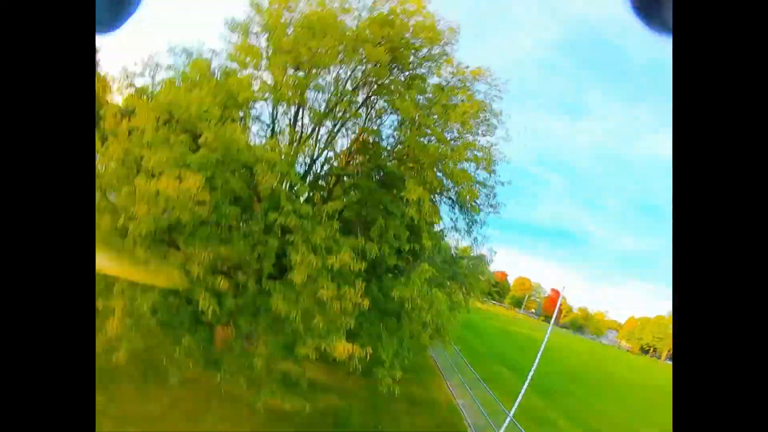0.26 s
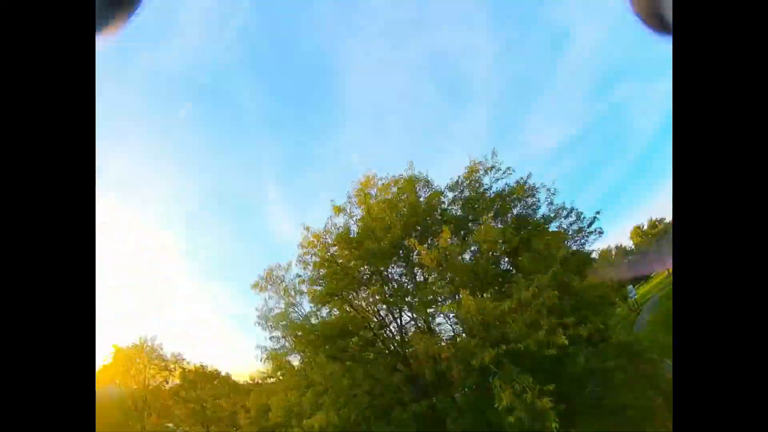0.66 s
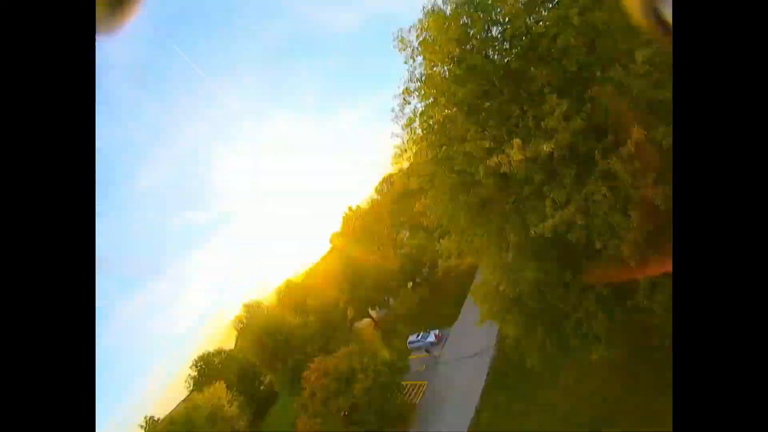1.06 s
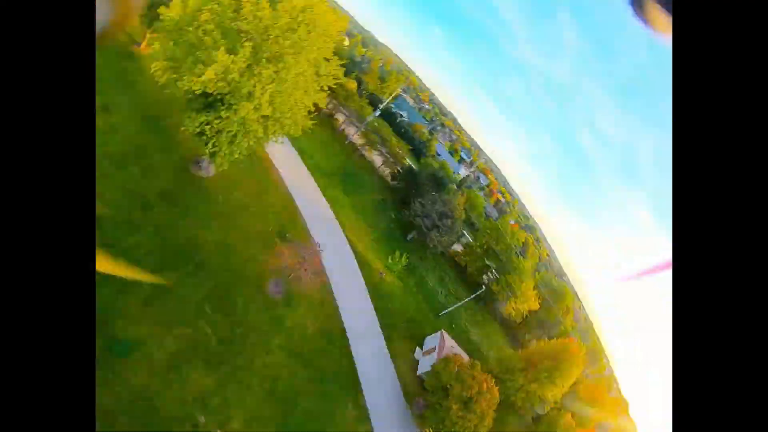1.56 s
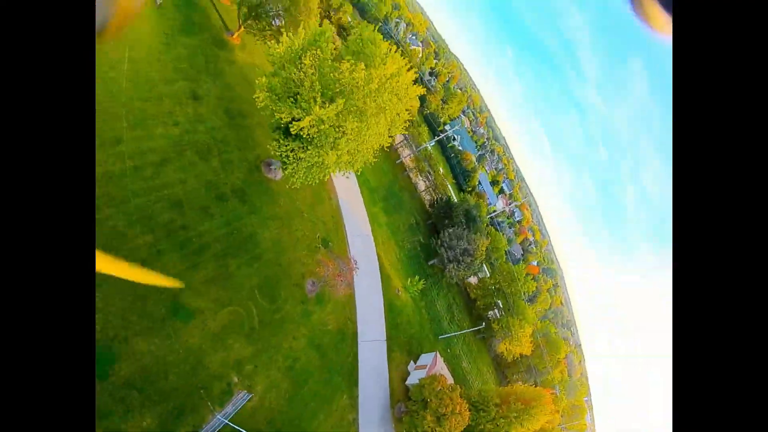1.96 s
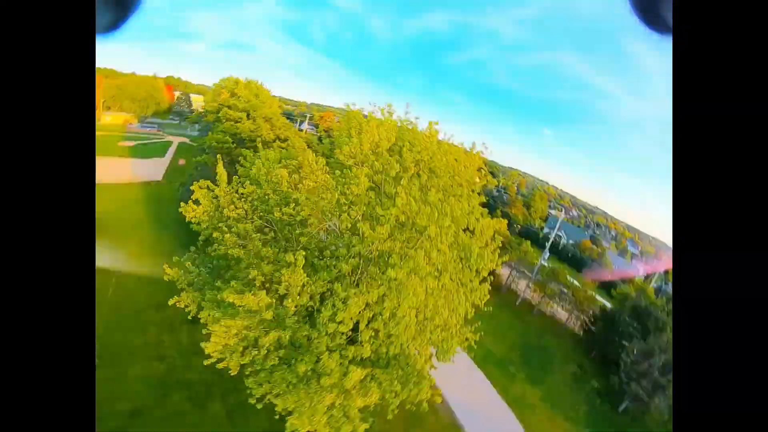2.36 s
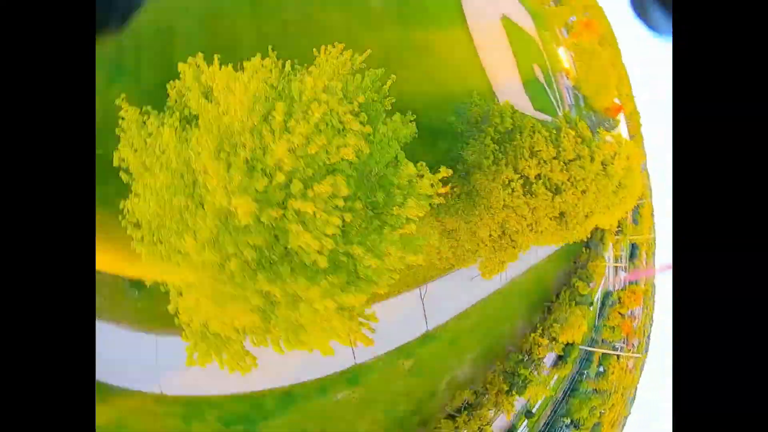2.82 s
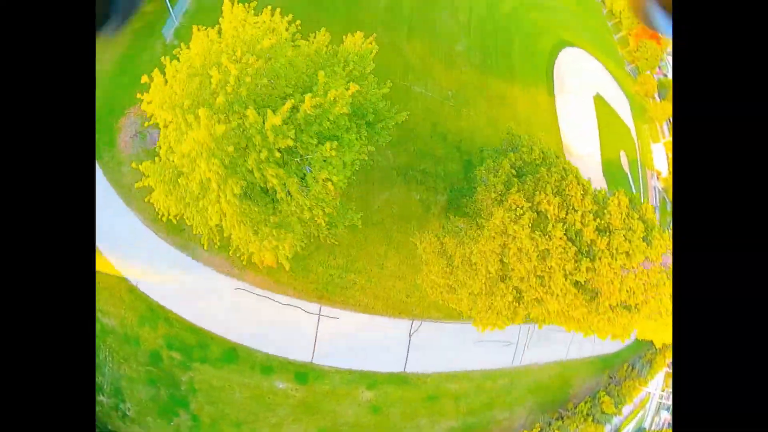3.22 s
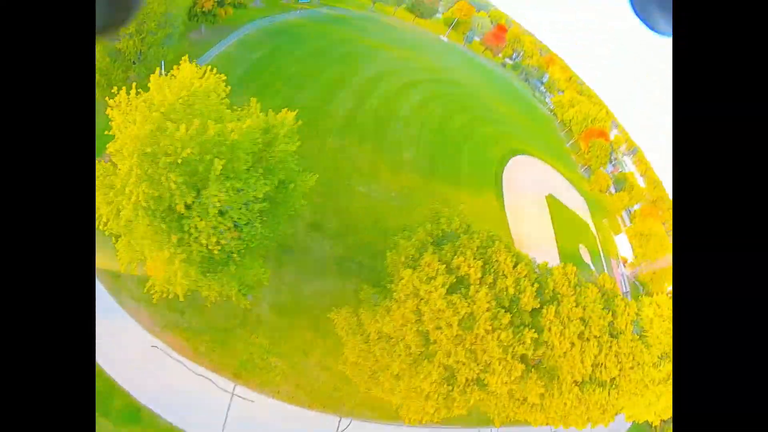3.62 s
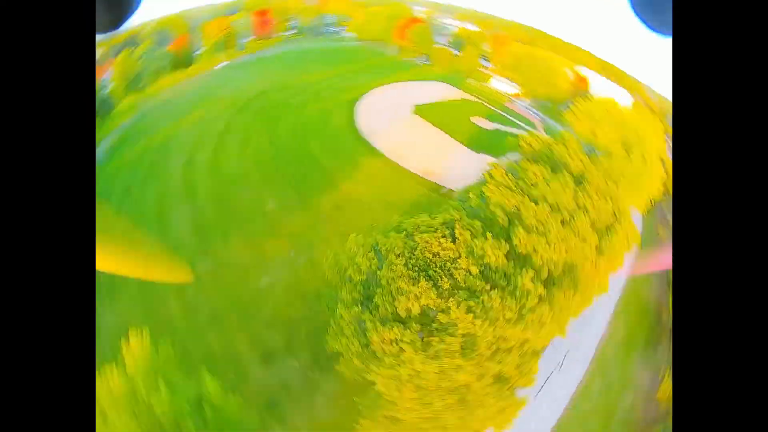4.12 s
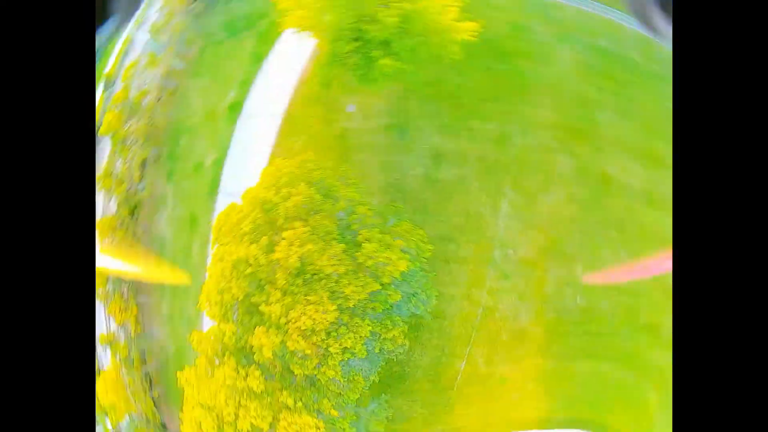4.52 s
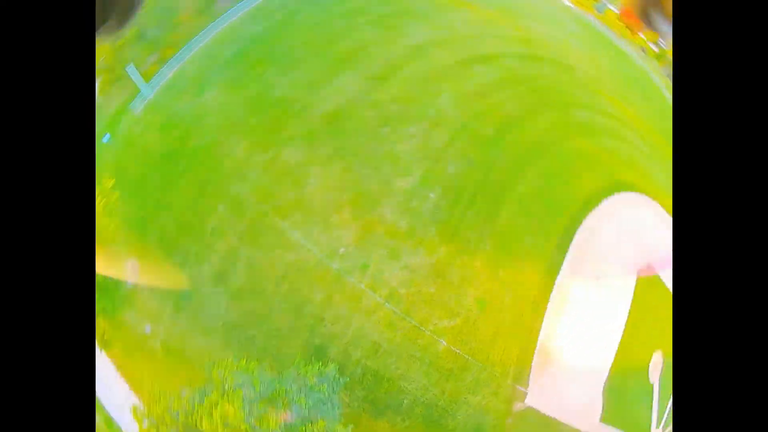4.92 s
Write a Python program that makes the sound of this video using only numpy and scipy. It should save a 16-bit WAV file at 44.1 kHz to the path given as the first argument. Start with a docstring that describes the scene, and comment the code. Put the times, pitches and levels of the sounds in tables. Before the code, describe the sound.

From a microphone mounted on a small racing quadcopter over an open park: a short high buzz opens, then drops to a low flutter. A longer rising scream, unsteady coasting, a sudden sharp burst, more low whirring and a final climbing punch follow. Four slightly mistuned motors beat together amid rushing air and wind thumps.

```python
"""A high, buzzing throttle punch is heard first: a small racing quadcopter flies over a park, heard from its own camera.
Three more punches follow, with lower, unsteady coasting between them.
Four motors follow one throttle at slightly different speeds: shaft hum, three-blade tone and thin whine beat and cross.
Rushing noise, stronger with speed, pulses with the blades; each shaft also makes the frame buzz.
Wind buffets the microphone, as low-pitched noise that swells and fades."""
import sys
import numpy as np
from scipy.fft import rfft, irfft, next_fast_len
from scipy.io import wavfile
from scipy.ndimage import uniform_filter1d, map_coordinates

SR = 44100
rng = np.random.default_rng(int(sys.argv[2]) if len(sys.argv) > 2 else 0)


def unload_audio(sound):
    """Save the sound as a 16-bit wav file, at the path given as the first command line argument."""
    columns = np.transpose(np.atleast_2d(sound))
    # keep every value between -1 and 1, then stretch to whole-number steps
    steps = np.round(np.clip(columns, -1, 1) * 32767)
    wavfile.write(sys.argv[1], SR, steps.astype(np.int16))


N = 228470  # length [samples]

# Speeds are turns of the shaft per second [Hz]. Table levels are starting points that the functions trim.
FULL_SPEED = 480  # reference speed [Hz]
CREEP_HZ_PER_S = 15  # at full throttle the propellers unload as the craft gathers speed
SPOOL_BEND, BRAKE_BEND = 1.08, 2  # powers of time that shape the climb and the braking
WAKE_S = 0.29  # after let-go the wake swell peaks this much later
CHURN_HZ_PER_S = 900  # a change of speed this fast stalls the blades and churns the air
SWITCH_HZ = 23770  # switching rate of the motor drive
TOP_HZ = 15750  # upper band limit of the camera

# Each motor with its propeller:
# (punch speed [share], lean [share], braking time [share], coasting speed [share], steering [share],
#  unbalance [dB], blade tone [dB], whine [dB])
ROTORS = [(1, -.07, 1, 1, 0.99, 1.5, -1.5, 2), (1, .93, .85, 1, -1, -9.5, -7.5, 2.5),
          (.913, .45, 1.25, 1.05, -.45, 1.34, -17.5, -10.5), (.805, .55, .9, .9, -.7, -11, -21, -6)]
# Throttle punches, before each rotor's shares:
# (start [s], spool-up [s], let-go [s], braking [s], first speed [Hz], top speed [Hz])
PUNCHES = [(0, .27, .28, .13, 342, 390), (.69, .375, 1.167, .118, 84, 480),
           (2.172, .07, 2.625, .087, 420, 484), (3.58, .325, 4.325, .09, 108, 482)]
# How far the opposite motor falls behind the lead under power, which sets their beat:
# (time [s], lag [share of the speed])
LEAN = [(.28, 0.0042), (.8, 0.051), (1.1, 0.0095), (2.22, 0.013), (2.33, .017), (2.5, 0.0049), (3.65, .12),
        (3.92, 0.2), (3.97, .075), (4.1, 0.032), (4.23, .012), (4.34, 0.04)]
# How hard the rotors work in each punch:
# (overtone swell [dB], wake [dB], rush [dB], blade tone [dB], shaft hum [dB])
EFFORT = [(3.5, -6, 0, 3, 5), (-0.5, 8, 4, 3, 2), (8.5, 5, 1, 0, -.5), (6, 2, 1, 0, -0.5)]
# How the frame passes the shaft hum: (frequency [Hz], level [dB])
SHAFT_RESPONSE = [(40, -79), (100, -83), (150, -61.5), (210, -36), (290, -31), (350, -34), (440, -32.5),
                  (490, -35.5)]
# How the frame passes the blade tone: (frequency [Hz], level [dB])
BLADE_RESPONSE = [(100, -53), (160, -43.5), (230, -49), (290, -36.5), (345, -25), (420, -32.5), (560, -32),
                  (800, -29.5), (1050, -29), (1250, -22.5), (1430, -15.5), (1500, -21.5)]
# How the frame passes the octave of the blade tone: (frequency [Hz], level [dB])
OCTAVE_RESPONSE = [(300, -54), (700, -42.5), (1400, -44.5), (2050, -32), (2350, -37.5), (2600, -33),
                   (2850, -30.5), (3000, -42.5)]
# Overtones of the blade tone at full speed: (multiple of the blade rate, level [dB])
OVERTONES = [(3, -48), (4, -39.5), (5, -42), (6, -48.5), (7, -55.5), (8, -57.5), (9, -60), (10, -64)]
# How the frame passes the magnetic whine: (frequency [Hz], level [dB])
WHINE_RESPONSE = [(2200, -69), (3200, -51), (4500, -60.5), (6500, -62.5), (9000, -66.5), (12500, -77),
                  (16000, -84)]
# Magnet cogs and drive steps in one turn of the shaft: (cogs [per turn], steps [per turn])
WHINE_ORDERS = (84, 42)
# How the frame passes its buzz: (frequency [Hz], relative level [dB])
FRAME_RESPONSE = [(500, -65), (750, -12), (1150, -1.5), (1500, -2), (2050, -7), (2500, -9), (3000, 2.5),
                  (3700, 4), (4200, -3.5), (4800, -14.5), (7000, -17), (12000, -97)]
# Wind on the microphone: (time [s], level [dB])
WIND = [(0.0, -51), (0.11, -51.5), (0.2, -66), (0.23, -50), (0.78, -86), (0.86, -71), (1.21, -61),
        (1.28, -73), (1.47, -54.5), (1.67, -67), (2.15, -90), (2.18, -71), (2.26, -48.5), (2.41, -53),
        (2.67, -55), (3.49, -77), (3.82, -39.5), (3.99, -61.5), (4.17, -51.5), (4.78, -81), (4.9, -52.5),
        (5.18, -71)]
# Air thrown by the propellers follows their mean speed: (speed [Hz], wash [dB], rush [dB], hiss [dB])
AIR_LEVELS = [(48.88, -46.5, -49, -78), (80.6, -48, -44.5, -73), (102.6, -42.5, -42.5, -66),
              (204, -45, -35, -54.5), (324, -35.5, -32, -49), (430, -45, -34.5, -46.5)]
# Colour of the low wind thumps: (frequency [Hz], relative level [dB per Hz])
BUFFET_COLOUR = [(20, -23), (50, -0.5), (100, 4), (170, 0), (300, -3), (700, -19), (2000, -70)]
# Colour of the mostly low and middle wash: (frequency [Hz], relative level [dB per Hz])
WASH_COLOUR = [(60, -42), (180, -1.5), (320, 6), (480, -3), (700, 11.5), (1000, 1), (1350, -11),
               (1700, -4.5), (2400, -19), (4000, -27), (12000, -60)]
# Colour of the rush through the frame's resonances: (frequency [Hz], relative level [dB per Hz])
RUSH_COLOUR = [(500, -14), (1100, 3), (1500, -0.5), (2050, -3), (2500, -13.5), (3100, 4.5), (3600, 0.5),
               (4100, -2.5), (4800, -12), (6500, -16), (9000, -30.5), (15000, -48)]
# Colour of the high hiss: (frequency [Hz], relative level [dB per Hz])
HISS_COLOUR = [(3000, -14), (6000, 5.5), (9000, 5.5), (11500, 2), (13000, -5), (16000, -11)]
# Colour of the microphone's own hiss: (frequency [Hz], relative level [dB per Hz])
SELF_NOISE_COLOUR = [(1000, -36), (9000, 26), (12300, 13), (13200, -7), (16000, -25)]
# Coasting between punches; steering lifts the lead motor and slows the opposite one:
# (time [s], mean speed [Hz], steering [Hz])
COAST = [(.49, 98, 8), (.56, 78.8, 9), (.68, 77.76, 3), (1.33, 92, -22), (1.38, 82, -18), (1.48, 95.1, 29),
         (1.57, 104.4, 38.5), (1.61, 102.5, 39.5), (1.66, 123.1, 27), (1.75, 115, 1), (1.83, 116.7, 4),
         (1.9, 57.2, 2), (1.97, 84.7, -6), (2.1, 54, -1), (2.16, 49.37, 9), (2.74, 91.02, 26),
         (2.82, 128, -4), (2.88, 108.9, -2), (2.97, 107.7, 1), (3.015, 80.17, -4), (3.09, 79.03, -3),
         (3.24, 60.88, -7), (3.46, 59.73, -8), (3.52, 81.94, -6), (3.59, 114.4, -3), (4.44, 94.8, 14.5),
         (4.49, 69.14, 5), (4.65, 73.74, 3), (4.69, 58.72, 2.5), (4.78, 63.8, 5), (4.83, 72.8, 16),
         (4.91, 66, 13), (5.02, 42.07, 3), (5.1, 72.1, 5), (5.18, 116.5, 8)]
# Quick flicks of the stick:
# (time [s], half length [s], extra mean speed [Hz], extra steering [Hz])
FLICKS = [(1.84, .018, 14, 16), (3.278, .025, 6, 3.5), (4.512, .016, 17, 0), (4.593, 0.02, 42, -39),
          (4.702, .012, 7.6, 1), (4.743, 0.014, 9, 2)]
# The overall level dips briefly; the end values hold before and after: (time [s], level [dB])
DIP = [(2.145, -4), (2.163, -17), (2.173, -32.5), (2.183, -1.5)]


def amp(db):
    """Turn decibels into a plain multiplier."""
    return 10 ** (np.asarray(db) / 20)


def unit(x):
    """Scale a signal to an rms level of 1."""
    return x / np.sqrt(np.mean(x ** 2) + 1e-20)


def along(points, hz):
    """Read a (frequency, value) table at any frequency, on a log axis."""
    table_hz, values = np.transpose(points)
    return np.interp(np.log(hz + 1), np.log(table_hz + 1), values)


def curves(rows):
    """One value per sample for each column after the time."""
    times, *columns = np.transpose(rows)
    return [np.interp(np.arange(N) / SR, times, column) for column in columns]


def wobble(rate):
    """A smooth random curve through `rate` random points a second."""
    points = rng.standard_normal(int(N * rate / SR) + 4)
    return map_coordinates(points, [np.arange(N) * rate / SR])


def filtered(x, response):
    """Shape the spectrum of x by a response that depends on frequency."""
    size = next_fast_len(N + SR // 2)  # spare room for the filter's tail
    spectrum = rfft(x, size) * response(np.fft.rfftfreq(size, 1 / SR))
    return irfft(spectrum, size)[:N]


def noise(colour):
    """Coloured noise of rms 1."""
    return unit(filtered(rng.standard_normal(N), lambda hz: amp(along(colour, hz))))


def tone(angle, db):
    """A sine of the given rms level."""
    return np.sqrt(2) * amp(db) * np.sin(angle)


def speed_change(speed, size):
    """How fast the speed changes, up or down [Hz per s], averaged over `size` samples."""
    return uniform_filter1d(np.abs(np.gradient(speed)) * SR, size=size)


def churn(speed):
    """0 at a steady speed, near 1 in a hard climb or braking."""
    return np.tanh(speed_change(speed, 1800) / CHURN_HZ_PER_S)


def punch_speed(t, brake_share):
    """Each punch spools up, creeps on at full throttle and brakes when the stick is let go."""
    speed = np.zeros(N)
    for start, spool, let_go, brake, first, top in PUNCHES:
        full = top - CREEP_HZ_PER_S * np.maximum(let_go - t, 0)
        climb = np.clip((t - start) / spool, 0, 1) ** SPOOL_BEND
        since = np.maximum(t - let_go, 0)
        braking = np.exp(-(since / (brake * brake_share)) ** BRAKE_BEND)
        speed += (t >= start) * (first + (full - first) * climb) * braking
    return speed


def spin(demand, hunt=.014, stumble=.016):
    """Inertia rounds the speed; random wobbles stand for controller trimming and stumbles in churned air."""
    speed = uniform_filter1d(demand, size=400)
    headroom = np.clip(1.05 - speed / FULL_SPEED, 0, 1)  # wobbles shrink near full speed
    trimming = headroom * hunt * wobble(45)
    stumbling = np.sqrt(headroom) * stumble * churn(speed) * wobble(18)
    speed = speed * (1 + trimming + stumbling)
    return speed, 2 * np.pi * (np.cumsum(speed) / SR + rng.random())


def blade_load(t, load_db=-4, edge_db=-3, shake_db=-1.5, inflow=0.092, linger_s=1.0):
    """Tips bite late in a punch; falling through their own wake, and wind, load the blades too."""
    wind, = curves(WIND)
    load_db = load_db + inflow * (wind - wind.mean())
    stir_db = 0
    for punch, effort in zip(PUNCHES, EFFORT):
        start, _, let_go, brake, *_ = punch
        swell_db, wake_db, rush_db, blade_db, hum_db = effort
        progress = np.clip((t - start) / (let_go - start), 0, 1)
        since = np.maximum(t - let_go, 0)
        powered = (t >= start) * np.exp(-(since / brake) ** 2)
        after = since / WAKE_S
        wake = after ** 2 * np.exp(1 - after ** 2)
        edge_db = edge_db + swell_db * np.sin(np.pi * progress ** 2)
        load_db = load_db + blade_db * powered + wake_db * wake
        shake_db = shake_db + hum_db * powered
        stir_db = stir_db + rush_db * np.exp(-((t - let_go) / linger_s) ** 2)
    return load_db, edge_db, shake_db, stir_db


def shaft_hum(speed, angle, second_db=-15, growth_db=-8):
    """Unbalance shakes the frame once a turn, with a weak octave."""
    octave_db = along(SHAFT_RESPONSE, 2 * speed) + second_db + growth_db * np.log10(speed / FULL_SPEED)
    hum = tone(angle, along(SHAFT_RESPONSE, speed) + 2 * wobble(54))
    return hum + tone(2 * angle, octave_db + 2 * wobble(60))


def blade_tone(speed, angle, strength_db, edge_db, rough_db, growth_db=42, second_growth_db=6,
               second_share=0.93, flutter=0.67):
    """Three blades pass in each turn; overtones grow with tip speed and flutter in the turbulence."""
    rate, phase = 3 * speed, 3 * angle
    decades = np.log10(speed / FULL_SPEED)
    sound = tone(phase, strength_db + along(BLADE_RESPONSE, rate) + rough_db * wobble(140))
    octave_db = second_share * strength_db + second_growth_db * decades + along(OCTAVE_RESPONSE, 2 * rate)
    sound += tone(2 * phase + 0.21 * wobble(200), octave_db + 2 * wobble(25.18))
    for multiple, db in OVERTONES:
        level = strength_db + db + growth_db * decades + edge_db
        sound += tone(multiple * phase + flutter * wobble(200), level + 2 * wobble(25.13))
    return sound


def magnet_whine(speed, angle, surge_db=8, step_db=-12, step_surge_db=25, surge_scale=1500):
    """Magnet cogs and drive steps each sing once per cog or step, louder when speeding up or braking hard."""
    current = np.tanh(speed_change(speed, 600) / surge_scale)  # surge_scale [Hz per s]
    levels = (surge_db * current, step_db + step_surge_db * current)
    sound = np.zeros(N)
    for order, db in zip(WHINE_ORDERS, levels):
        hz = order * speed
        whine = tone(order * angle, along(WHINE_RESPONSE, hz) + db + 4.3 * wobble(35))
        sound += whine * (hz < SR / 2)  # leave out pitches too high for the sample rate
    return sound


def switching_tone(t, speed, angle, level_db=-37, ring_hz=3700, width_hz=380):
    """The drive's switching rate minus its step rate falls into a frame resonance at full throttle."""
    steps = WHINE_ORDERS[1]
    hz = SWITCH_HZ - steps * speed
    difference = tone(2 * np.pi * SWITCH_HZ * t - steps * angle, level_db + 0.83 * wobble(40))
    return difference / (1 + ((hz - ring_hz) / width_hz) ** 2)


def frame_buzz(speed, angle, count=34, size=2048, jitter=0.039):
    """Every turn repeats the same uneven rattle of bearings and blades: `count` multiples of the shaft rate."""
    harmonics = np.exp(2j * np.pi * rng.random(count))  # equal strengths, random phases
    one_turn = unit(irfft(np.append(0, harmonics), size))
    place = (angle + jitter * wobble(150)) / (2 * np.pi) % 1
    rattle = np.interp(place, np.arange(size) / size, one_turn)
    return rattle * np.sqrt(speed / FULL_SPEED) * amp(2 * wobble(35))


def air(speed, stir_db, chop, buzz, buffet_db=6, wash_db=2.5, rush_db=-3, buzz_db=-3, hiss_db=4,
        floor_db=-78, churn_wash_db=-0.5):
    """Wind thumps; wash, rush and hiss follow speed, rush and hiss pulse with the blades, the frame buzzes."""
    buffet, = curves(WIND)
    speeds, *levels = np.transpose(AIR_LEVELS)
    wash, rush, hiss = [np.interp(speed, speeds, db) for db in levels]
    wash = wash + churn_wash_db * churn(speed)
    rush = rush + stir_db
    low = amp(buffet + buffet_db + 0.77 * wobble(24.6)) * noise(BUFFET_COLOUR)
    low += amp(wash + wash_db) * noise(WASH_COLOUR)
    high = amp(rush + rush_db) * noise(RUSH_COLOUR) + amp(hiss + hiss_db) * noise(HISS_COLOUR)
    resonant_buzz = unit(filtered(buzz, lambda hz: amp(along(FRAME_RESPONSE, hz))))
    frame = amp(rush + buzz_db) * resonant_buzz
    pulsing = unit(amp(2 * chop + wobble(110) + wobble(35)))
    return low + frame + high * pulsing + amp(floor_db) * noise(SELF_NOISE_COLOUR)


def coast_speed(t, steer_share):
    """Low throttle; steering speeds up some motors and slows others, and flicks add short bumps."""
    mean, steering = curves(COAST)
    speed = mean + steer_share * steering
    for time, half, extra, turn in FLICKS:
        speed += (extra + steer_share * turn) * np.exp(-((t - time) / half) ** 2)
    return speed


def scene(idle_shade=0.43, calm_rough_db=1.18, churn_rough_db=2):
    """Four rotors share a frame and stir the air; the frame shades the far propellers most at high pitch."""
    t = np.arange(N) / SR
    load_db, edge_db, shake_db, stir_db = blade_load(t)
    lean, = curves(LEAN)
    tones, chop, buzz, air_power = np.zeros((4, N))
    for power, leaning, braking, coasting, steering, unbalance_db, blade_db, whine_db in ROTORS:
        driven = power * (1 - leaning * lean) * punch_speed(t, braking)
        coasted = coasting * coast_speed(t, steering)
        speed, angle = spin(np.maximum(driven, coasted))
        shade = idle_shade + (1 - idle_shade) * speed / FULL_SPEED
        rough_db = calm_rough_db + churn_rough_db * churn(speed)
        tones += amp(unbalance_db + shake_db) * shaft_hum(speed, angle)
        tones += amp(load_db) * blade_tone(speed, angle, shade * blade_db, edge_db, rough_db)
        tones += amp(whine_db) * (magnet_whine(speed, angle) + switching_tone(t, speed, angle))
        buzz += frame_buzz(speed, angle)
        chop += np.cos(3 * angle) + np.cos(angle)  # once a blade and once a turn
        air_power += speed ** 3 / len(ROTORS)
    mean_speed = np.cbrt(air_power)  # fast rotors count most
    sound = tones + air(mean_speed, stir_db, unit(chop), buzz)
    return sound * amp(curves(DIP)[0])


def record(dry):
    """The camera keeps nothing above its band limit."""
    return filtered(dry, lambda hz: hz < TOP_HZ)[None]


dry = scene()
out = record(dry)
unload_audio(out)
```